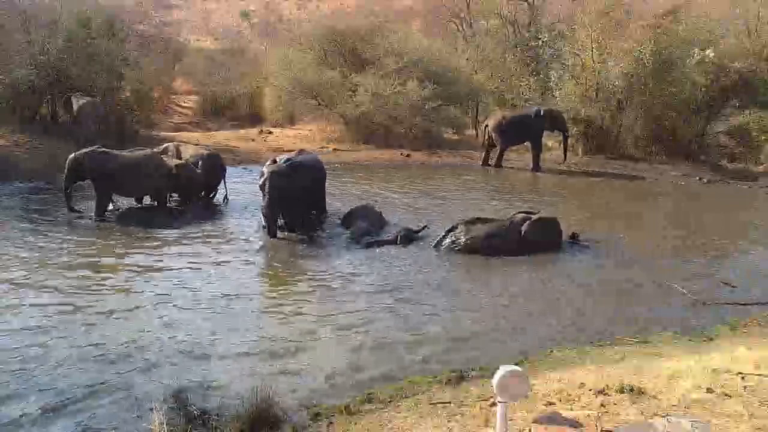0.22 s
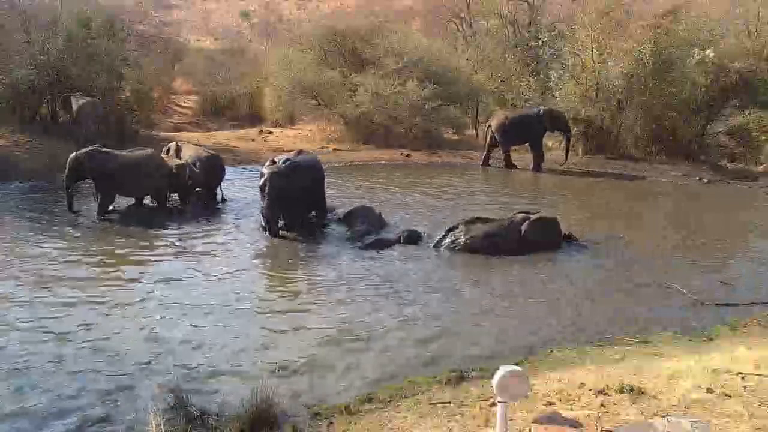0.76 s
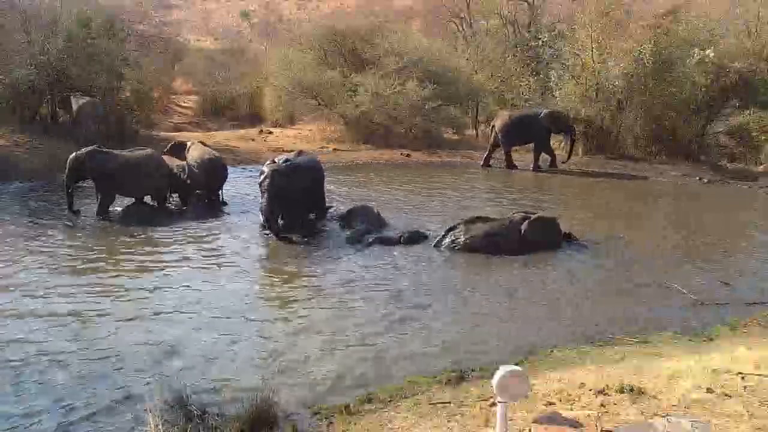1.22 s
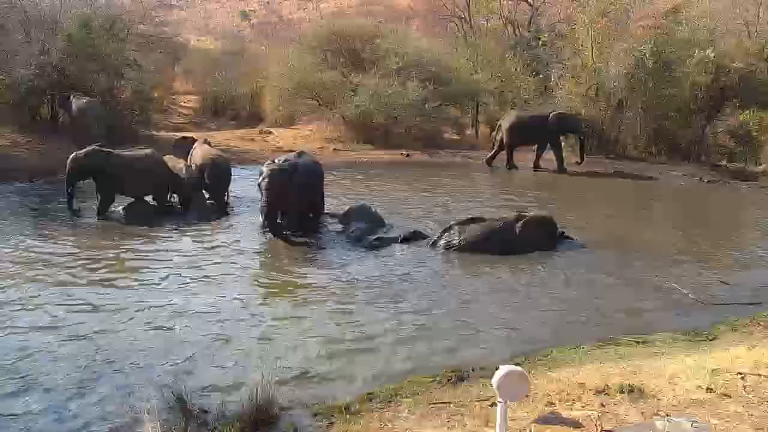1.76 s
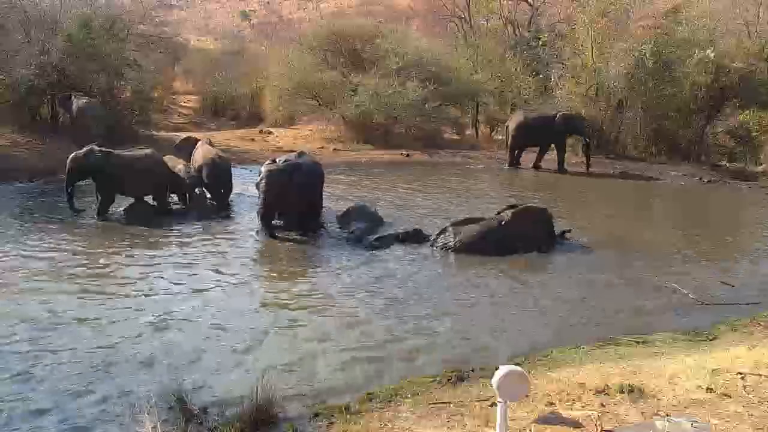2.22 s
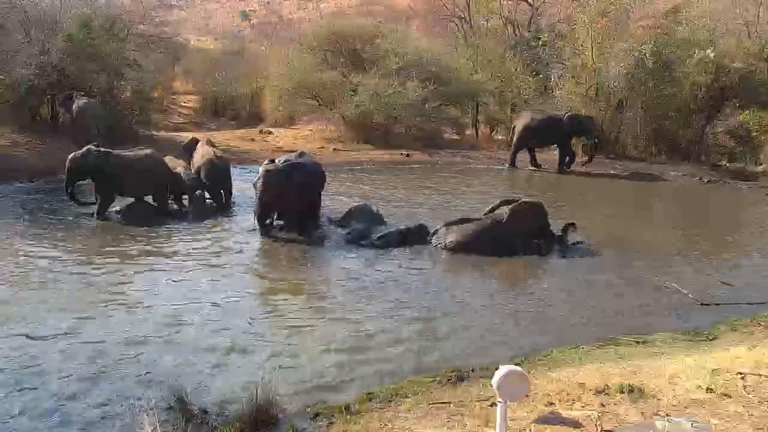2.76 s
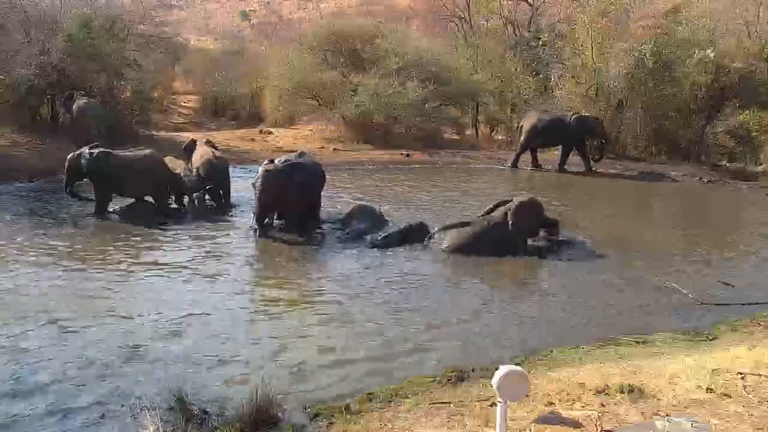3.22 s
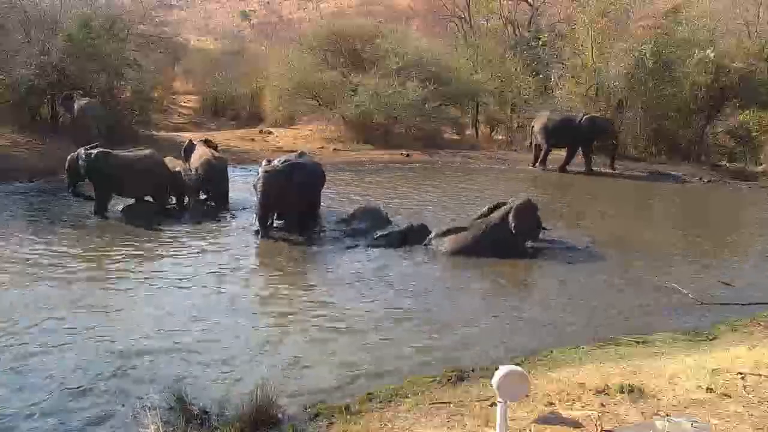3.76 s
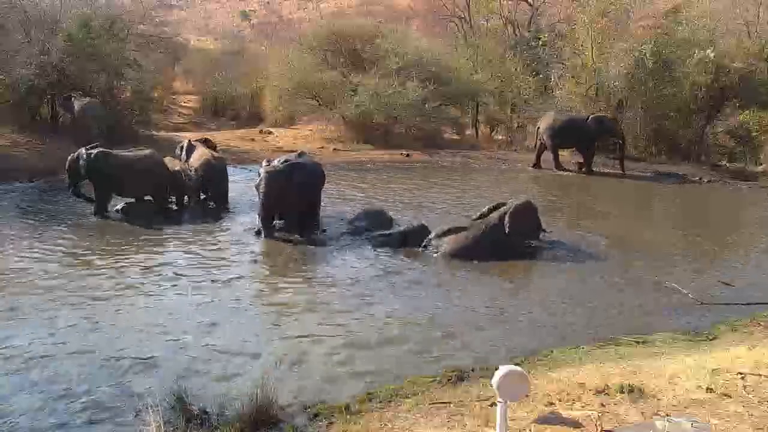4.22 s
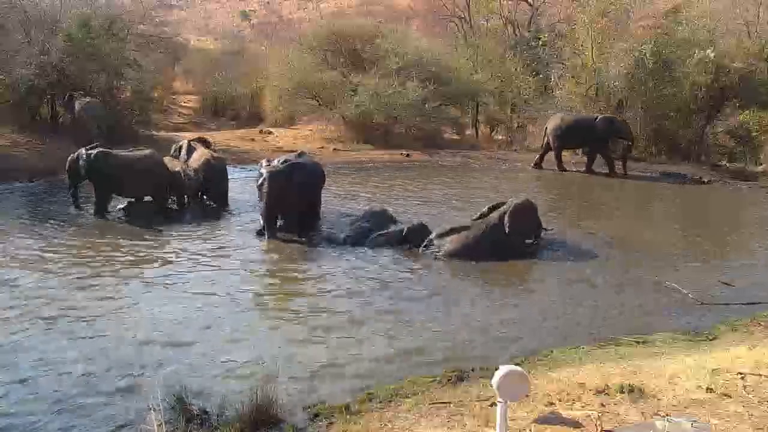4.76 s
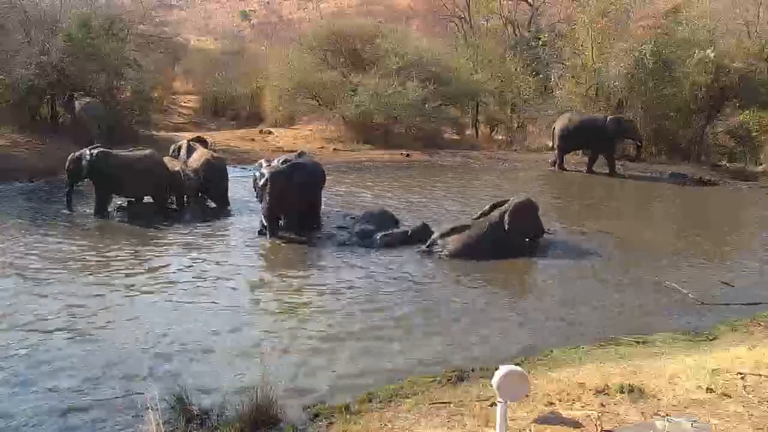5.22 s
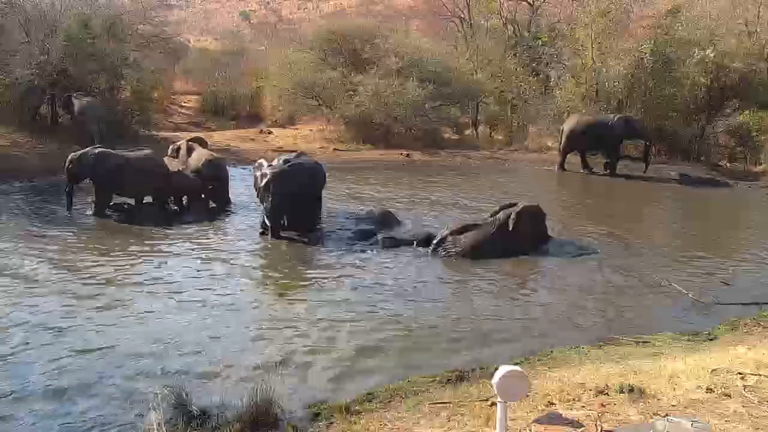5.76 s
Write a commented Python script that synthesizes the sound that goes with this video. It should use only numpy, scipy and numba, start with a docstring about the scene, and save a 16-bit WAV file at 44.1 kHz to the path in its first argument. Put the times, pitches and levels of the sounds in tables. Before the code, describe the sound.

Elephants wade and roll in a shallow waterhole some way off. Uneven sloshing and gurgling swells after half a second, with hollow plunges, gulps and splashes of pattering spray, and one sharper plunge stands out early. The water then calms to lighter sloshing with scattered splats and drips. The outdoor microphone sounds hollow and boxy, with soft air noise and a faint electric buzz underneath.

```python
"""Elephants wade and roll in a shallow waterhole, some way off.
Their bodies fold air into the water, where it gurgles, plunges and gulps, and throw up spray that
patters back as drops, splats and fine mist. The banks add a thin tail; open air and a light breeze
form the bed. The microphone's hollow housing rings boxily near 370 Hz, over a faint electric buzz."""
import sys
import numpy as np
from scipy import signal
from scipy.fft import rfft, irfft, next_fast_len
from scipy.io import wavfile
from scipy.ndimage import uniform_filter1d
from numba import njit

SR = 44100
rng = np.random.default_rng(int(sys.argv[2]) if len(sys.argv) > 2 else 0)


def wav_out(sig):
    """Save sig, one row per channel (or a flat mono array), as 16-bit PCM at SR to the path in sys.argv[1]."""
    wavfile.write(sys.argv[1], SR, np.round(np.clip(np.atleast_2d(sig).T, -1, 1) * 32767).astype(np.int16))


N = 263718
TIME = np.arange(N) / SR
FFT_SIZE = next_fast_len(N + SR // 2)
FREQS = np.maximum(np.arange(FFT_SIZE // 2 + 1) * SR / FFT_SIZE, 1)

# fader rides, before trim: a body heaves over, then calmer wading: t/s, gurgle level/dB, spray level/dB
WALLOW_RIDES = [(0.0, -45.5, -48.0), (0.53, -28.5, -39), (0.66, -31, -40.5), (0.92, -27.5, -37),
                (1.18, -32.5, -41), (1.48, -28.5, -41), (1.56, -34, -37.0), (1.78, -32, -37.5),
                (2.1, -25, -35.5), (2.51, -30.5, -34.5), (2.61, -36.0, -39.5), (3.75, -36.5, -46.5),
                (4.18, -37, -46.5), (4.36, -32, -40), (4.6, -38.5, -46), (5.22, -32.0, -45.5),
                (5.48, -37.5, -51.5), (5.82, -33.5, -41.5)]
# tone of the bed, outdoor air and far lapping: f/Hz, gain/dB
AIR_EQ = [(25, 3), (60, -2.5), (120, 2.5), (250, 0.5), (400, -5), (800, -0.5), (2000, 1.5), (4000, 0.5),
          (7000, 0), (11000, -9)]
# air pockets closing under a limb or flank: t/s, peak level/dB, f/Hz, attack/s
PLUNGE_CUES = [(0.250, -25, 380, 0.012), (0.519, -22.5, 392, .005), (0.733, -12.5, 366.6, .018),
               (0.891, -20, 339, 0.0038), (1.049, -18.5, 335, 0.0047), (1.510, -6, 396, 0.0036),
               (1.531, -22, 365, 0.0097), (1.845, -19, 375, 0.0038), (1.885, -16.5, 373, 0.0064),
               (1.996, -15, 342, 0.018), (2.113, -19, 340, .009), (2.183, -16.5, 358, 0.0035),
               (2.383, -16, 332, 0.0038), (2.452, -17.5, 348, 0.0094), (3.030, -26, 366, 0.0039),
               (3.572, -19, 368, 0.0063), (4.224, -16, 365, 0.0047), (4.311, -21.5, 363, .006),
               (4.345, -22.5, 350, 0.0098), (5.054, -26, 300, 0.0036), (5.213, -20.5, 366, 0.0089),
               (5.265, -21, 304, 0.0038), (5.401, -25, 370, 0.01)]
# hollows in the water that open or fill: t/s, length/s, start f/Hz, end f/Hz, peak level/dB
GULP_CUES = [(0.47, 0.06, 298.7, 326, -22), (0.681, .06, 213, 267, -32), (1.03, 0.072, 160, 190, -33),
             (1.105, 0.05, 298, 348, -25), (1.515, .056, 148, 240, -27.5), (1.539, 0.069, 1060, 882, -38.5),
             (1.926, .1, 329, 275, -21), (2.487, 0.09, 299.6, 265, -25.5), (2.655, .06, 325, 281, -24.5),
             (3.002, .06, 245, 290, -32.5), (3.324, 0.046, 240, 278, -34), (3.665, 0.042, 290, 325, -26),
             (4.442, .085, 141, 114, -39.5), (4.518, 0.12, 278, 190, -35.5), (5.049, 0.2, 272, 215.3, -33),
             (5.47, .17, 138, 98, -39)]
# thrown water slapping the surface: t/s, peak level/dB, fizz gain/dB, attack/s
SPLAT_CUES = [(0.555, -26.5, -9, 0.0085), (0.979, -23.5, 8, 0.0023), (1.033, -22, -1, 0.016),
              (1.064, -25.5, 4, 0.0045), (1.227, -26, 0, 0.0087), (1.509, -20.5, 2, 0.0035),
              (1.895, -24, 5, .011), (2.495, -28, 5, 0.007), (2.664, -26, -7, .012), (3.000, -30, -6, .003),
              (3.095, -29, 1, 0.0033), (3.347, -26.5, -3, 0.0026), (3.408, -27.5, -3, 0.0093),
              (3.582, -31.5, -3, .005), (3.844, -30, -5, 0.0042), (3.987, -32.5, -8, 0.0036),
              (4.343, -35, -4, .01), (4.418, -32, -1, .006), (4.555, -30, -5, 0.0045),
              (4.670, -28.5, -4, 0.0034), (4.776, -29, -2, 0.0036), (5.079, -34, -10, .004),
              (5.254, -24, -10, 0.0086), (5.768, -30, -9, 0.0065), (5.867, -30.5, -12, 0.0036)]
# single ringing drips: t/s, peak level/dB, start f/Hz, t60/s
DRIP_CUES = [(1.078, -32, 3050, 0.04), (2.783, -36, 2750, 0.076), (5.660, -36, 3120, 0.11)]
# resonances of the microphone housing: f/Hz, width/Hz, boost/dB
HOUSING_PEAKS = [(368.4, 123.4, 21), (489.4, 80, 7), (760, 50, 1), (878, 74, 6), (1339, 179, 12),
                 (1903, 16, 6.5), (1996, 324, 20.5), (2718, 189, 14), (2917, 151, 16), (3085, 274, 9),
                 (3480, 168, 15.5), (3707, 280, 9), (4000, 106, 11.5), (4144, 131, 17), (4463, 100, 13.5),
                 (4690, 100, 6), (5071, 350, 16.5), (6050, 55, 5.8), (6900, 48, 3.5), (7840, 38, 4.2),
                 (8320, 210, 10.5), (9000, 150, 5), (9855, 87, 10.5), (10800, 115, 9)]
# broad tone of the housing under those resonances: f/Hz, gain/dB
HOUSING_EQ = [(25, -12.5), (60, -9), (120, -4), (250, 0.0), (550, -2.05), (1050, -9.5), (1600, -16.5),
              (2400, -22.5), (3300, -17), (4330, -25), (5700, -26.5), (7300, -30), (9400, -37),
              (11000, -40.5)]
# electric buzz on multiples of 100 Hz: f/Hz, rms level/dB
BUZZ_PARTIALS = [(800, -58), (900, -59), (1200, -56), (1300, -68), (1500, -80), (2000, -58.5)]


def undb(db):
    """Decibels to gain."""
    return 10 ** (np.asarray(db) / 20)


def eq_curve(points):
    """Join (f/Hz, gain/dB) points on a log-frequency axis."""
    hz, db = np.transpose(points)
    return np.interp(np.log(FREQS), np.log(hz), db)


def band(x, lo_hz, hi_hz, order=2):
    """Butterworth band-pass."""
    return signal.sosfilt(signal.butter(order, [lo_hz, hi_hz], "band", fs=SR, output="sos"), x)


def housing_impulse():
    """Every hit rings on in the resonances of the hollow housing."""
    peaks_db = sum(boost / (1 + (2 * (FREQS - hz) / width) ** 2) for hz, width, boost in HOUSING_PEAKS)
    cepstrum = irfft(np.log(undb(eq_curve(HOUSING_EQ) + peaks_db)), FFT_SIZE)
    cepstrum[1:FFT_SIZE // 2] *= 2  # minimum phase: the ring follows the hit
    cepstrum[FFT_SIZE // 2 + 1:] = 0
    return irfft(np.exp(rfft(cepstrum)), FFT_SIZE)[:4096]


HOUSING_IR = housing_impulse()


def housed(x):
    """A sound as it arrives inside the housing."""
    return signal.oaconvolve(x, HOUSING_IR)[:len(x)]


def fader(x, db):
    """Normalise a layer by its rms inside the housing, then ride its level."""
    return x * undb(db) / np.std(housed(x))


def place(out, at_s, x, peak_db):
    """Drop in a one-shot, scaled to its peak level inside the housing."""
    start = int(at_s * SR)
    gain = undb(peak_db) / np.abs(housed(x)).max()
    out[start:start + len(x)] += gain * x[:N - start]


def wobble(rate_hz):
    """Random modulator: sample-and-hold, smoothed twice, with a spread of 1."""
    hold = int(SR / rate_hz)
    steps = np.repeat(rng.standard_normal(N // hold + 1), hold)
    smooth = uniform_filter1d(uniform_filter1d(steps, hold), hold)[:N]
    return smooth / smooth.std()


def decay(t, t60):
    """Exponential decay that loses 60 dB in t60 seconds."""
    return np.exp(-np.log(1000) * t / t60)


def swell(t, attack_s, t60):
    """Linear attack into an exponential decay."""
    return np.minimum(t / attack_s, decay(t - attack_s, t60))


@njit
def ring_bubbles(starts, pitches, cycles, gains, rise):
    """Each bubble is a dying sine whose pitch climbs as it nears the surface."""
    out = np.zeros(N)
    for k in range(len(starts)):
        length, phase = int(cycles[k] * SR / pitches[k]), 0.
        for i in range(min(length, N - starts[k])):
            age = i / length
            phase += 2 * np.pi * pitches[k] * (1 + rise * age) / SR
            out[starts[k] + i] += gains[k] * np.exp(-6 * age) * np.sin(phase)
    return out


def bubbles(count, lo_hz, hi_hz, cycles, scatter_db, rise):
    """A cloud of bubbles of all sizes, most of them weak and a few strong."""
    when, pitch, ring, strength, polarity = rng.random((count, 5)).T
    hz = lo_hz * (hi_hz / lo_hz) ** pitch
    accent_db = scatter_db * np.minimum(-np.log(1 - strength), 4)
    gains = undb(accent_db) * np.sign(polarity - .5) * hz ** 1.5  # favours the small, bright bubbles
    cloud = ring_bubbles((when * N).astype(np.int64), hz, cycles * (.5 + ring), gains, rise)
    return cloud / cloud.std()


def patter(size, scatter_db):
    """Dense drop impacts of uneven strength."""
    clicks = rng.standard_normal(size) * undb(scatter_db * rng.standard_normal(size))
    return clicks / clicks.std()


def gurgle(db):
    """The bodies churn large bubbles under, in quick uneven surges."""
    cloud = bubbles(count=2600, lo_hz=129.6, hi_hz=806, cycles=14, scatter_db=2.5, rise=.13)
    return fader(band(cloud, 110, 836) * undb(1.94 * wobble(25.93)), db)


def spray(db):
    """Sheets of water fall back: a patter of impacts with small ringing bubbles."""
    cloud = bubbles(count=10000, lo_hz=647.7, hi_hz=4297, cycles=44, scatter_db=3, rise=.061)
    impacts = band(patter(N, scatter_db=3.5), 600, 5540, order=4)
    return fader((cloud + undb(6) * impacts) * undb(wobble(30)), db)


def mist(db):
    """The finest droplets fizz on top."""
    cloud = bubbles(count=12000, lo_hz=5400, hi_hz=10900, cycles=17, scatter_db=4, rise=.1)
    impacts = undb(9.5) * patter(N, scatter_db=7)
    fizz = band(cloud + impacts, 5240, 14000, order=4)
    return fader(fizz * undb(1.6 * wobble(35)), db)


def air():
    """A bed of open air that breathes a little."""
    spectrum = rfft(rng.standard_normal(N), FFT_SIZE) * undb(eq_curve(AIR_EQ))
    bed = irfft(spectrum, FFT_SIZE)[:N]
    return fader(bed * undb(.85 * wobble(3.5)), db=-39)


def breeze(start_db=-68.5, rise_db_per_s=2.5):
    """Light wind rumbles unevenly on the housing and steadily freshens."""
    rumble = band(rng.standard_normal(N), 22, 105) * undb(3.2 * wobble(8))
    return fader(rumble, start_db + rise_db_per_s * TIME)


def plunges():
    """An air pocket swells, snaps shut and throbs briefly, with a short churn of water behind it."""
    out, t = np.zeros(N), TIME[:SR // 4]
    for at_s, db, hz, attack_s in PLUNGE_CUES:
        pocket = np.sin(2 * np.pi * hz * t) * swell(t, attack_s, t60=.03)
        churn = band(rng.standard_normal(len(t)), 110, 1200) * decay(t, t60=.11)
        place(out, at_s, pocket + undb(-1) * churn, db)
    return out


def gulps():
    """Turbulence blows through a hollow whose note slides as its size changes."""
    out = np.zeros(N)
    for at_s, length_s, start_hz, end_hz, db in GULP_CUES:
        size = int(length_s * SR)
        phase = 2 * np.pi * np.cumsum(np.geomspace(start_hz, end_hz, size)) / SR
        turbulence = wobble(132)[:size] + 1j * wobble(136.3)[:size]
        rough_note = np.real((.56 + turbulence) * np.exp(1j * phase))
        arch = np.sin(np.linspace(0, np.pi, size))
        place(out, at_s, rough_note * arch, db)
    return out


def splats():
    """A slap of water swells and breaks into a fast-dying shower of drops."""
    out, t = np.zeros(N), TIME[:SR // 3]
    for at_s, db, fizz_db, attack_s in SPLAT_CUES:
        shower = swell(t, attack_s, t60=.11)
        drops = band(patter(len(t), scatter_db=2) * shower, 2320, 5500, order=1)
        fizz = band(patter(len(t), scatter_db=2) * shower, 5000, 14000)
        place(out, at_s, drops + undb(fizz_db) * fizz, db)
    return out


def drips():
    """A lone bubble rings with a clear, slightly rising note."""
    out, t = np.zeros(N), TIME[:SR // 4]
    soft_attack = 1 - np.exp(-t / .01)
    for at_s, db, hz, t60 in DRIP_CUES:
        note = np.sin(2 * np.pi * hz * t * (1 + .32 * t))
        place(out, at_s, note * decay(t, t60) * soft_attack, db)
    return out


def banks(x, t60, wet_db):
    """The banks and bushes scatter back a thin, dull tail."""
    t = TIME[:SR // 2]
    build_up = 1 - np.exp(-t / .016)
    tail = band(rng.standard_normal(len(t)), 140, 6300) * decay(t, t60) * build_up
    return x + undb(wet_db) * signal.oaconvolve(x, tail / np.linalg.norm(tail))[:N]


def scene():
    """The wash of churned water and its one-shots, over the outdoor bed."""
    times, gurgle_ride, spray_ride = np.transpose(WALLOW_RIDES)
    slop_db = .92 * wobble(14)  # small waves move gurgle, spray and mist together
    gurgle_db = np.interp(TIME, times, gurgle_ride) + slop_db
    spray_db = np.interp(TIME, times, spray_ride) + slop_db
    mist_db = -55.5 + 1.03 * (spray_db + 40)  # mist follows the spray almost dB for dB
    gurgle_trim_db, spray_trim_db = -2, -.3
    wash = gurgle(gurgle_db + gurgle_trim_db) + spray(spray_db + spray_trim_db) + mist(mist_db)
    water = wash + plunges() + gulps() + splats() + drips()
    return (banks(water, t60=.57, wet_db=-14.5) + air() + breeze())[None]


def record(dry):
    """The housing colours the mix, the wiring adds its buzz, and a steep high cut takes off the top."""
    buzz = sum(np.sqrt(2) * undb(db) * np.sin(2 * np.pi * (hz * TIME + rng.random()))
               for hz, db in BUZZ_PARTIALS)
    high_cut = signal.ellip(12, .2, 90, 11100, fs=SR, output="sos")
    return signal.sosfilt(high_cut, housed(dry[0]) + buzz)[None]


dry = scene()
out = record(dry)
wav_out(out)
```